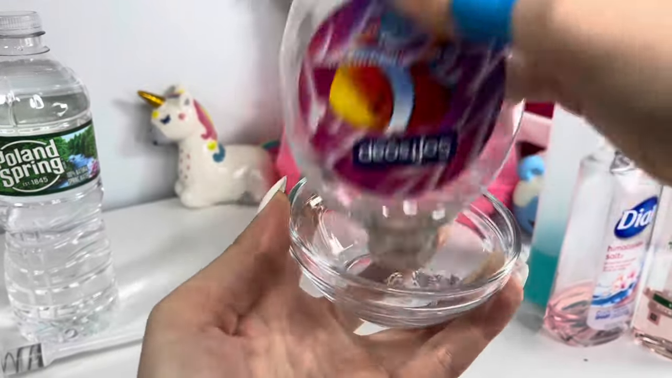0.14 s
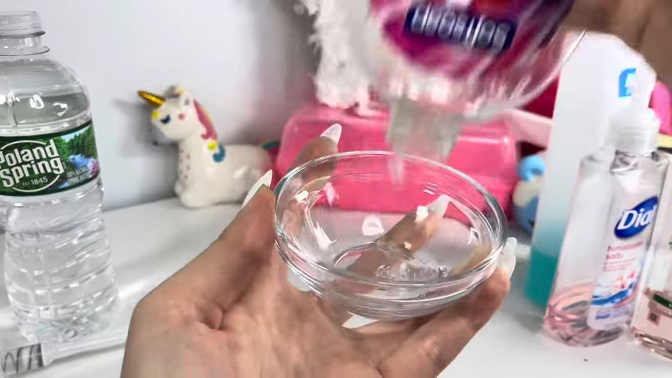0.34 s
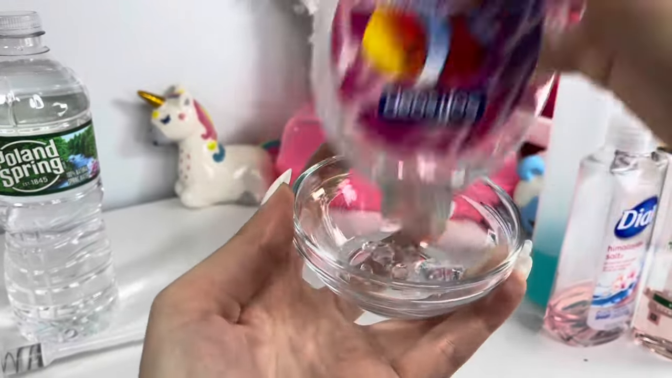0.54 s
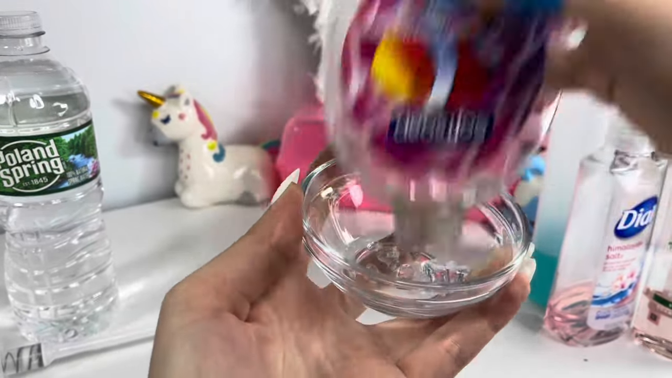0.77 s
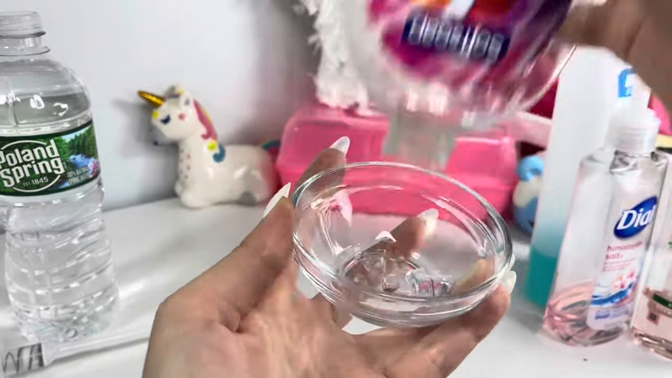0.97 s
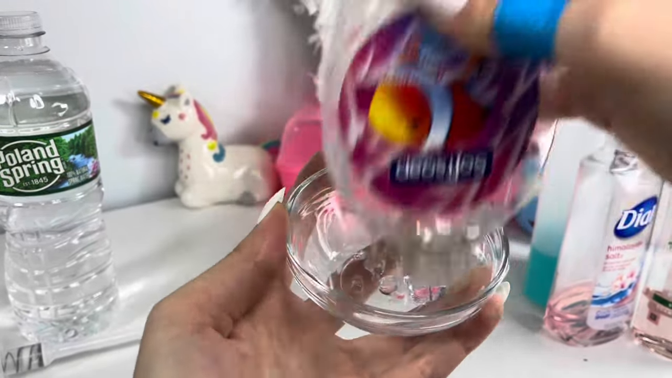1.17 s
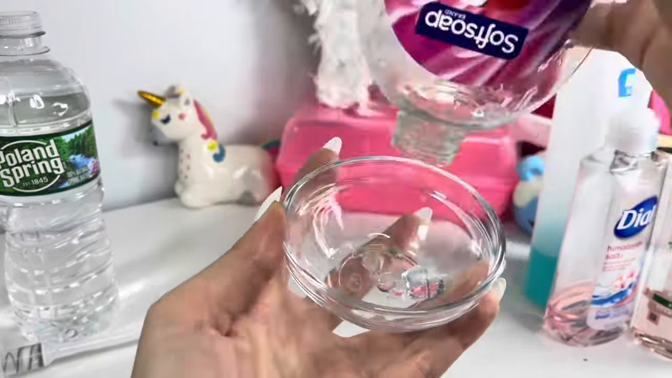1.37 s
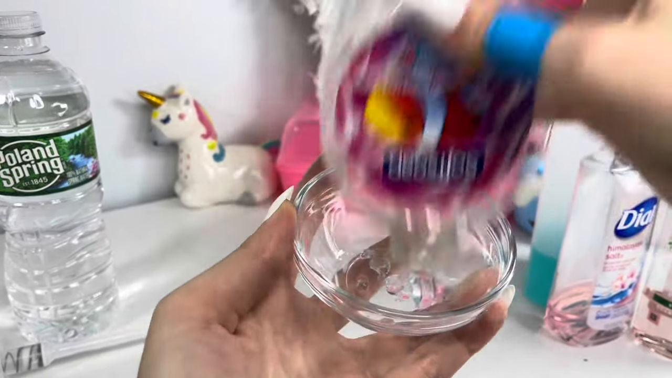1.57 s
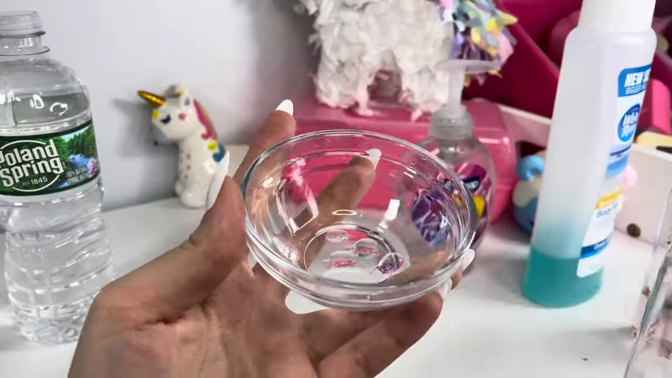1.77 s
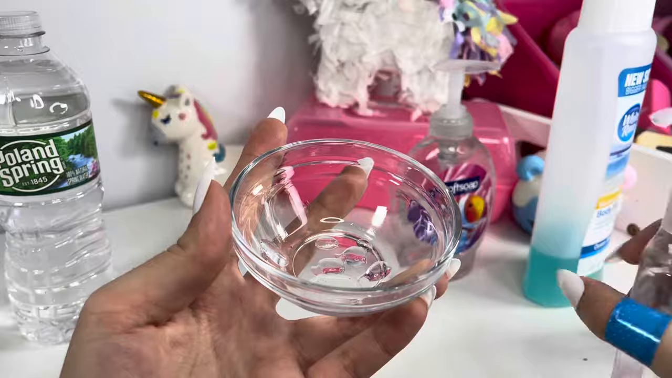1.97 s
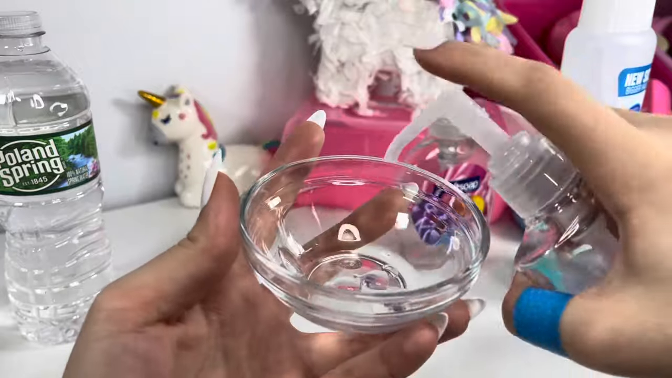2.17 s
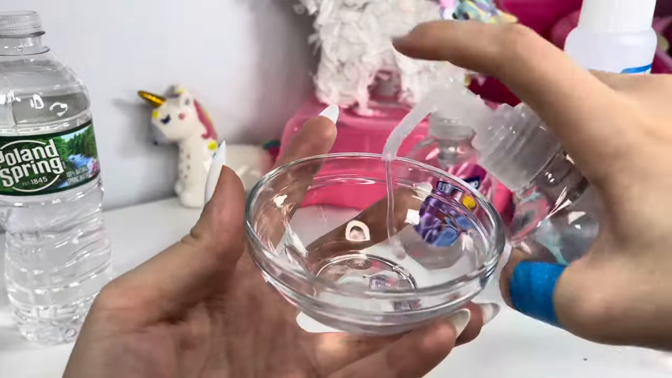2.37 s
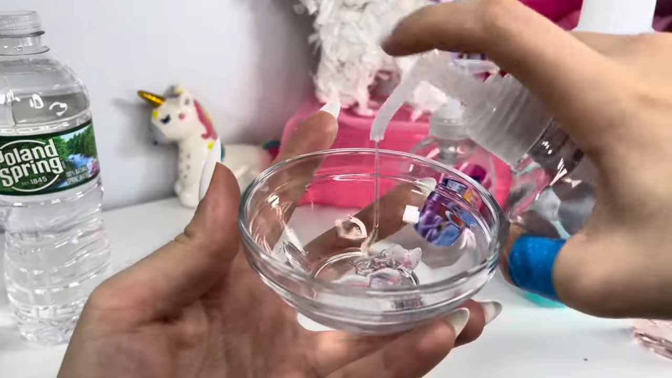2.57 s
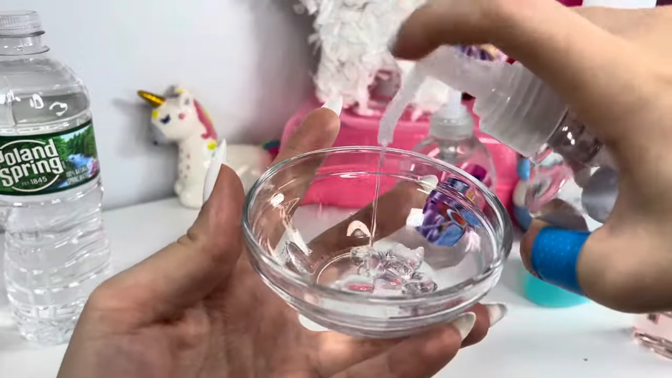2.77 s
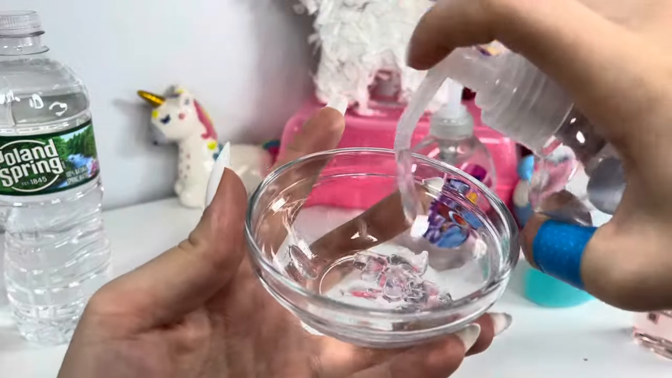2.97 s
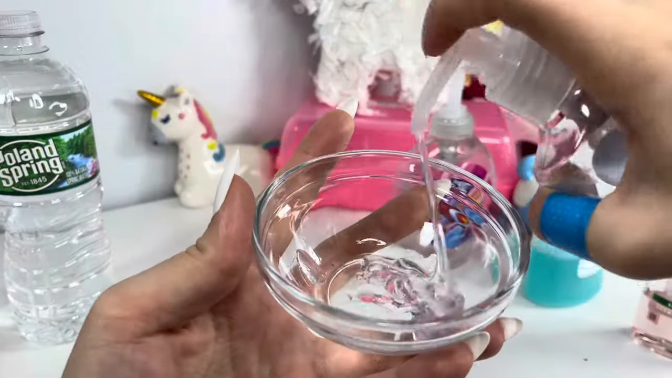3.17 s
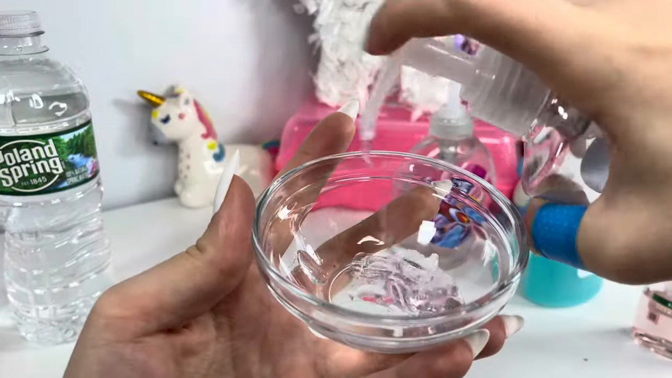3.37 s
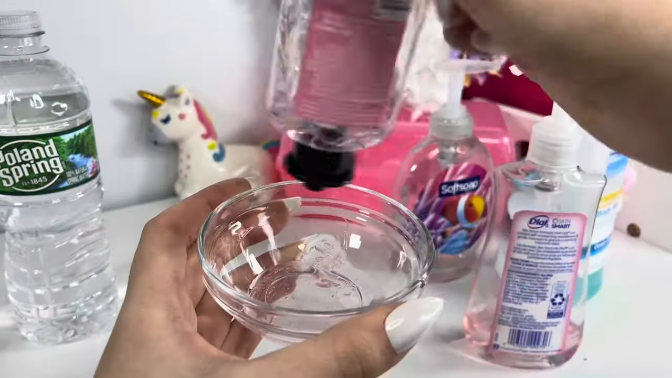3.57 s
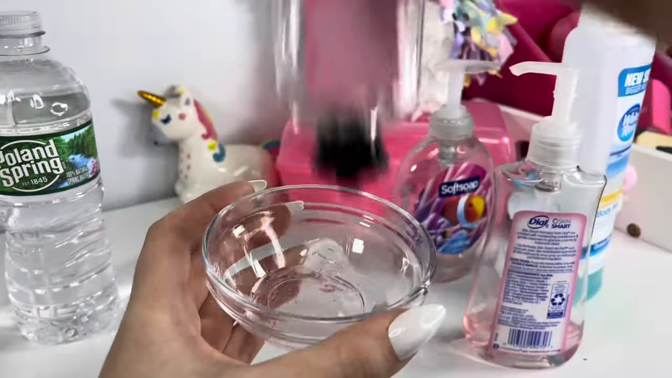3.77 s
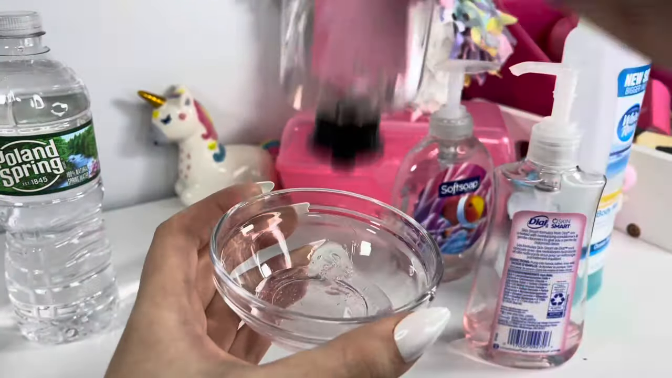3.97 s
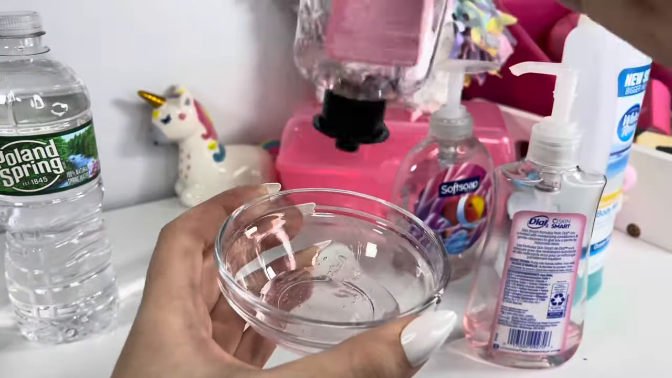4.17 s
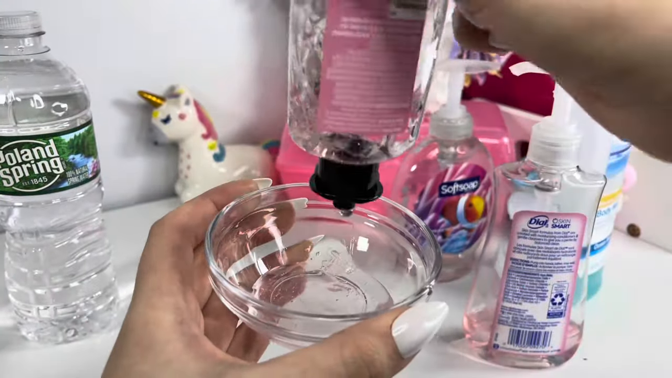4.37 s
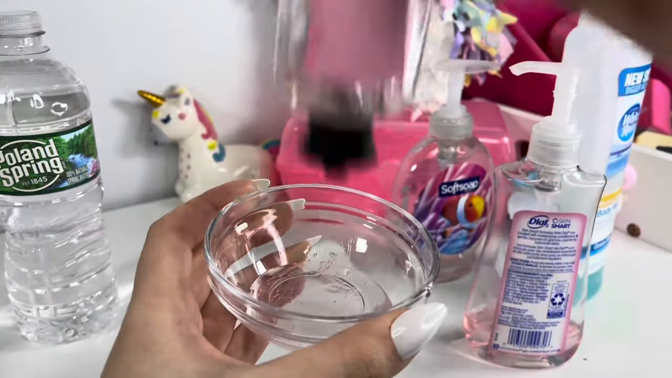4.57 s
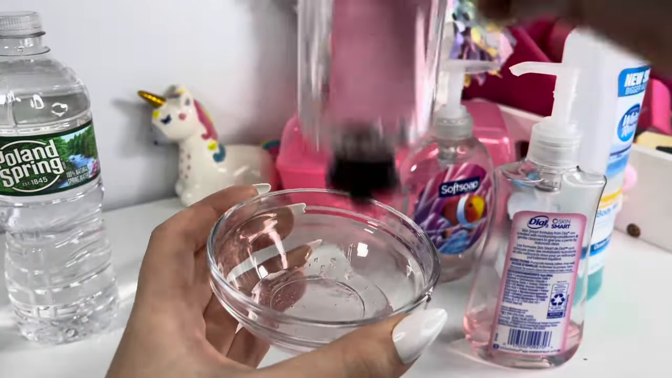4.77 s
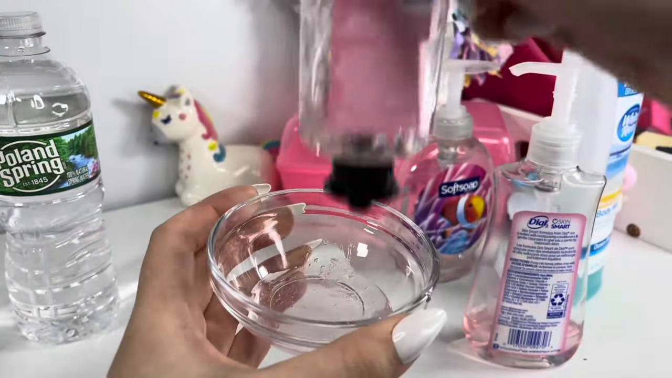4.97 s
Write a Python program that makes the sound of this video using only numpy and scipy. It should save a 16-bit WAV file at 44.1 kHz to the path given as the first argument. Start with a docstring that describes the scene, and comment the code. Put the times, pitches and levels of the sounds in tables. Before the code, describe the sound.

Close, dry stereo phone pickup in a small room with very short reflections and a barely audible low hum. A faint fingertip swish opens; a plastic bottle neck knocks a glass bowl at 0.23 and 0.48 s, bright and quickly damped. From about 0.6 to 1.65 s come tiny plastic creaks and soap ticks, with a clustered triple-contact knock at 1.56. Fingers slide softly near 1.7 and 1.9; a bottle bumps with a slosh at about 1.98. From 2.26 to 3.46 a pump alternates presses and springy returns roughly every 0.08 to 0.12 s: clicks, short hisses, wet spits strongest around 3.1, small bubble pops. Hard desk thumps cluster at 3.55-3.58. A loud, crisp cap snap hits at 3.87, with a weak catch at 4.29. Gel sputters in short bursts at 4.33-4.47 with tiny chirping squeaks and a dull thud. After near silence, the cap snaps sharply at 4.87.

```python
"""Soap bottles and a glass bowl

Plastic soap bottles are emptied into a hand-held glass bowl, close to a phone in a small dry room.
An upturned bottle knocks on the bowl and ticks as it is shaken; a pump clicks, hisses and spits in quick
strokes; a flip cap snaps open, gel and air sputter out, and the cap snaps shut, all over a faint hum.
Contacts are damped modes plus a noise crack; air and rubbing are shaped noise; soap and squeaks are
gliding oscillations."""
import sys
import numpy as np
from scipy import signal
from scipy.fft import rfft, irfft, next_fast_len
from scipy.io import wavfile
from scipy.ndimage import uniform_filter1d

SR = 44100
rng = np.random.default_rng(int(sys.argv[2]) if len(sys.argv) > 2 else 0)


def store_pcm(level_fs):
    """Save levels as 16-bit WAV."""
    pcm = np.round(np.clip(level_fs, -1, 1) * 32767).astype(np.int16)
    wavfile.write(sys.argv[1], SR, np.atleast_2d(pcm).T)


N = 221602
TIME = np.arange(N) / SR

# Levels are relative, before panning and gains in the code. Modes are nominal: blows shift pitch and decay.
# still air, spectrum: freq_hz, level_db
AIR_SPECTRUM = [(15, -48.5), (25, -26), (117, 1.5), (170, -4.5), (293, -12.5), (354, -15), (591, -13),
                (818, -22), (2220, -29.5), (2690, -26.5), (5730, -45.5), (9320, -41.5), (13200, -21),
                (16000, -37.5)]
HUM_HZ, HUM_DB, AIR_DB = 116.59, -74, -72.5

# room reflections, spectrum: freq_hz, level_db
ROOM_SPECTRUM = [(100, -6), (330, 1.5), (560, 8), (850, 4.5), (1500, -3), (4000, -3.5), (9000, -2.5),
                 (16000, -7)]
ROOM_T60_S, ROOM_DB = 0.14, -17.5

# left/right level difference for sounds at the bowl: freq_hz, left_minus_right_db
PORT_SHADE = [(300, -1), (700, -2), (1700, 5), (2600, 4), (4200, -2.5), (7000, -2), (12000, 0)]
LEFT_LEAD_S = .00006

# fingers sliding over plastic: start_s, length_s, level_db
SLIDES = [(1.69, 0.20114, -66), (1.9, 0.13496, -60.5), (2.23, 0.27342, -70.5), (3.3, 0.19142, -63),
          (3.62, 0.12, -74.5), (4.17, 0.4111, -69), (4.9, 0.0938, -72)]
# sliding fingers, spectrum: freq_hz, level_db
SLIDE_SPECTRUM = [(120, -54), (200, -4.5), (456, -11.5), (735, -14.5), (1400, -20.5), (1560, -33),
                  (1770, -17.5), (3250, -16.5), (12600, -23), (16000, -33)]
# short swishes of a fingertip on the bottle: start_s, length_s, level_db
SWISHES = [(0, 0.073, -64), (0.102, 0.05, -69.5)]
# fingertip swish, spectrum: freq_hz, level_db
SWISH_SPECTRUM = [(400, -9.5), (1800, -9), (2900, -2.5), (3700, -10.5), (8000, -34), (16000, -29.5)]
SLIDE_ATTACK_S, SLIDE_RELEASE_S = 0.004, 0.023
HOLD_DB = -81.5  # faint rustle of the hand that holds the bowl

# contact crack, spectrum: freq_hz, level_db
CRACK_SPECTRUM = [(50, -52), (200, -16), (600, -13), (2000, 4), (6000, -1), (11000, 0.5), (16000, -5)]
MODE_SCATTER = .025  # largest random detuning, fraction of mode frequency

# loudest creaks of plastic walls: start_s, level_db, tilt_db_per_octave
CREAKS = [(.73, -51.5, 3), (1.0227, -49, -1), (1.165, -54.5, -1), (1.25, -54, -5.5), (1.402, -56, -9),
          (1.4183, -53, 5), (1.45, -45, 16), (2.2895, -52, 9.5), (3.5276, -49, -2), (4.0712, -55, 12.5),
          (4.139, -54, -1.5)]
# shaken bottle, modes: freq_hz, level_db, t60_s
BOTTLE_MODES = [(599.9, -8.5, 0.064), (1592, -7.5, 0.017), (1784.3, -1, 0.017), (3830, -7, 0.022)]
SHAKE_START_S, SHAKE_LENGTH_S = .72, 0.95  # span of the faint random creaks
CREAK_DB, CREAK_RANGE_DB, CREAK_TILT_DB = -64, 6, 0

# bottles bumped and set down on the desk: start_s, level_db, tilt_db_per_octave, ring_factor
THUMPS = [(1.968, -32, 1.5, 0.511), (2.002, -44.5, 5.5, 0.7844), (3.5505, -33.5, 5, 0.6444),
          (3.553, -29, 5.5, 0.44), (3.562, -38.5, 3.5, 1), (3.5705, -24, 0.5, 0.61),
          (3.575, -23.5, 0.5, 0.5327)]
# bottle wall flexing in the hand, dull thuds: start_s, level_db, ring_factor
GRIPS = [(2.27, -62.5, 0.709), (2.32, -59.5, 1.005), (2.40, -62.5, 3.313), (4.4605, -35, 0.41)]
# desk, modes: freq_hz, level_db, t60_s
DESK_MODES = [(181.13, -1, 0.09221), (313.94, -0.5, 0.055), (531.98, -0.5, 0.026), (579.63, -23, 0.26),
              (803.1, -5, 0.023), (1342.5, -21, 0.034), (1856.1, -6, 0.014), (3363.1, -6, 0.0076)]
THUD_TILT_DB, THUD_PITCH = -10, .66
RECOIL_DB, RECOIL_RING = -41, 1.4  # thud of the bottle, level relative to the SNAPS entry

# air squeaking through the wet cap: start_s, length_s, start_hz, end_hz, level_db
SQUEAKS = [(4.411, 0.0053, 2784, 3660, -23), (4.415, .010, 3898, 8519, -28),
           (4.4229, 0.0071, 8790, 10220, -25.5), (4.449, .010, 3685, 2381, -22),
           (4.456, 0.004, 10970, 9074, -20)]

# soap sloshing in a bumped bottle: start_s, length_s, level_db
SLOSHES = [(1.914, 0.0153, -54.5), (1.978, 0.014, -28.5), (2.005, .02, -40.5)]
# gel and air sputtering from the flip cap: start_s, length_s, flap_db, spray_db_re_flap
SPUTTERS = [(4.327, .041, -26, -5.5), (4.375, .016, -32.5, -5.5), (4.417, .015, -41, 6.5),
            (4.446, .012, -38.5, 8), (4.4544, .016, -27, -11)]
# spray, spectrum: freq_hz, level_db
SPRAY_SPECTRUM = [(60, -31), (250, -2.5), (800, 13.5), (1300, -3.5), (1800, 6.5), (3200, 7), (5000, -7),
                  (8000, -5), (11000, -1), (15500, -7)]
SLOSH_START_HZ, SLOSH_END_HZ = 311.87, 366.7
SPIT_DELAY_S, SPIT_S, SPIT_START_HZ, SPIT_END_HZ = .002, .014, 390.97, 225.89
PRESS_SPIT_DB, RETURN_SPIT_DB = -41, -51  # at 0 dB flow
SPUTTER_START_HZ, SPUTTER_END_HZ = 866.32, 220.11
FLAP_WANDER = 0.03023  # unsteadiness of the gel flapping in the cap, radians per sample

# large soap bubbles bursting at the pump spout: start_s, level_db
POPS = [(2.5469, -44), (2.668, -54), (2.8389, -52), (2.9129, -56), (3.002, -49.5), (3.1577, -45),
        (3.1692, -41.5), (3.233, -46), (3.2485, -45.5), (3.333, -52.5)]
# bubble at the spout, modes: freq_hz, level_db, t60_s
SPOUT_MODES = [(650.4, 5, 0.006487), (1142.1, -8, 0.0216), (1674.2, 4.5, 0.018), (2397, -14.5, 0.0091),
               (3149.2, 15, 0.01015)]
POP_TILT_DB, POP_PITCH, POP_RING = -6.5, 0.8331, 0.9108

# pump head pushed down to its stop: click_s, click_db, hiss_db, hiss_lead_s
PRESSES = [(2.2596, -43.5, -54.5, .012), (2.4564, -40.5, -48.5, 0.018214), (2.628, -34, -48.5, 0.02148),
           (2.8034, -32.5, -47, 0.007993), (2.9663, -34, -46.5, 0.008577), (3.1284, -33.5, -50, .004),
           (3.2795, -40, -46, .008), (3.4563, -43, -49, 0.009471)]
# pump head springing back up: click_s, click_db, hiss_db, hiss_lead_s
RETURNS = [(2.3765, -28.5, -49, 0.011087), (2.5393, -37, -43.5, 0.00387), (2.718, -31, -45, 0.00544),
           (2.8874, -38, -46.5, 0.011103), (3.0516, -32, -52.5, .02), (3.2116, -36, -38.5, .008),
           (3.379, -42, -51, 0.01426)]
# soap flow as the pump primes and runs out: time_s, flow_db
SOAP_FLOW = [(2.55, -21), (2.8, -6.5), (3.1, -0.5), (3.3, -9), (3.46, -20.5)]
# pump, modes: freq_hz, level_db, t60_s
PUMP_MODES = [(395.02, -9, 0.0061), (821.53, -2.5, 0.008497), (1502.7, -8.5, 0.026), (1801.6, 1.5, 0.012),
              (2648.9, 1, 0.02), (3465.3, 3, 0.011), (4151.9, 9.5, 0.004), (6256, -5, 0.0057),
              (8638, -16, 0.0033), (11942, -15, 0.0057)]
# air and soap past the piston, spectrum: freq_hz, level_db
HISS_SPECTRUM = [(200, 4), (500, 9.5), (800, 3.5), (1600, 11), (3500, 4), (6000, 2), (8000, 4.5),
                 (11300, 4), (16000, 2)]
DRY_STROKE_S, WET_STROKE_S = .036, 0.011  # nominal hiss length, and extra at 0 dB flow
FIRM_CLICK_DB = -31.5  # weaker return clicks than this sound thinner

# flip cap catching and snapping: start_s, level_db, tilt_db_per_octave, pitch_factor, ring_factor
SNAPS = [(3.869, -15.5, 2.5, 0.9936, 0.6415), (4.2878, -40, -0.5, 0.9659, 0.1342),
         (4.8373, -49, -17, 0.788, 0.64), (4.8666, -15.5, -1, 0.9838, 0.5403)]
# flip cap, modes: freq_hz, level_db, t60_s
CAP_MODES = [(653.34, -11, 0.011), (2053.5, -11.5, 0.012), (2586.4, 4.5, 0.016), (3722, 1, 0.023),
             (4259.5, -3, .014), (4824, -10.5, .012), (6247.8, -1.5, 0.027), (7222, -2.5, 0.0069),
             (8627, -3.5, 0.013), (9857.6, -3, 0.024), (11600, -15, 0.021), (12220, -12.5, 0.0084),
             (15460, -11, 0.0092)]
# chattering lid, spectrum: freq_hz, level_db
CHATTER_SPECTRUM = [(100, -39), (700, -17), (1400, -30.5), (2400, 0.5), (3300, -5), (6500, -4),
                    (10000, -7.5), (16000, -10.5)]

# bottle neck on the bowl: start_s, level_db, tilt_db_per_octave, pitch_factor, ring_factor
KNOCKS = [(.2258, -12, -2.0543, 0.99965, 0.6628), (.4758, -14.5, -3.5, 1.037, 0.5419),
          (1.5548, -20, -2, 0.88193, 1.711), (1.5584, -13.5, -4.5, 1.0, 1),
          (1.5632, -21, -4, 0.97265, 0.689)]
# glass bowl, modes: freq_hz, level_db, t60_s
BOWL_MODES = [(342, -20, 0.029), (438.79, -15, 0.045), (591.75, -7.5, 0.023), (795.5, -17, 0.018),
              (1037.6, -8, 0.017), (1307, -14.5, 0.0057), (1562.7, 2, 0.02), (1827.7, -2, 0.028),
              (2146.6, -1, 0.0043), (2603.2, 0, 0.02), (3748.2, 0.5, 0.022), (4536, -6, 0.02),
              (5589, -13.5, 0.0038), (6406.6, -19.5, 0.0089), (7830, -24, 0.0034), (10036, -3, .009)]


def undb(db):
    """Decibels to gain."""
    return 10 ** (np.asarray(db) / 20)


def unit(x):
    """Scale to rms 1."""
    return x / np.sqrt(np.mean(x ** 2))


def decay(t, t60_s):
    """Exponential decay, 60 dB down at t60_s."""
    return np.exp(-np.log(1000) * t / t60_s)


def highpass(x, order, cutoff_hz):
    """Butterworth high-pass."""
    return signal.sosfilt(signal.butter(order, cutoff_hz, "high", fs=SR, output="sos"), x)


def add(out, start_s, x):
    """Mix a stereo sound in at start_s."""
    start = max(int(start_s * SR), 0)
    out[:, start:start + x.shape[1]] += x[:, :N - start]


def pan(x, left_db):
    """Raise left over right by left_db."""
    return x * undb(np.array([[left_db], [-left_db]]) / 2)


def curve_db(f, table):
    """Interpolate a table of level over log frequency."""
    hz, db = np.transpose(table)
    return np.interp(np.log(f), np.log(hz), db)


def noise(count, spectrum, apart_hz=2600):
    """Coloured stereo noise: alike at both ports in the bass, unrelated in the treble."""
    f = np.fft.rfftfreq(count, 1 / SR) + 1
    mid, side = rfft(rng.standard_normal((2, count))) * undb(curve_db(f, spectrum))
    side = side * f / np.hypot(f, apart_hz)
    return unit(irfft(np.array([mid + side, mid - side]), count))


def strike(modes, tilt_db, pitch, ring, crack_db, crack_t60, rise_s, apart_hz):
    """A contact: damped modes and a short crack, rms 1 over the first 4 ms."""
    t = TIME[:SR // 8]
    hz, db, t60_s = np.transpose(modes)[:, :, None]
    # grip and contact point detune the modes from blow to blow
    hz = hz * pitch * (1 + MODE_SCATTER * rng.uniform(-1, 1, hz.shape))
    # higher modes reach the two ports further out of step
    port_phase = rng.standard_normal((2, *hz.shape)) * hz / apart_hz
    phase = rng.uniform(0, 2 * np.pi, hz.shape) + port_phase
    size = undb(db + tilt_db * np.log2(hz / 1000))
    body = np.sum(size * np.sin(2 * np.pi * hz * t + phase) * decay(t, t60_s * ring), axis=1)
    tilt_floor_hz = CRACK_SPECTRUM[1][0]
    crack_spectrum = [(f, d + tilt_db * np.log2(max(f, tilt_floor_hz))) for f, d in CRACK_SPECTRUM]
    crack = noise(len(t), crack_spectrum) * decay(t, crack_t60)
    x = (unit(body) + undb(crack_db) * unit(crack)) * (1 - np.exp(-t / rise_s))
    # a small object radiates little below its lowest mode
    x = highpass(x, 2, 1.1 * hz.min())
    return x / np.sqrt(np.mean(x[:, :SR // 250] ** 2))


def blows(table, modes, crack_db, crack_t60, rise_s, apart_hz, bounce=0.16):
    """Each blow rings the same object, which touches again a millisecond or two later."""
    out = np.zeros((2, N))
    for start_s, db, tilt_db, pitch, ring in table:
        hit = strike(modes, tilt_db, pitch, ring, crack_db, crack_t60, rise_s, apart_hz)
        hit = undb(db) / np.hypot(1, bounce) * hit
        add(out, start_s, hit)
        # the second touch is weaker and carries little bass
        add(out, start_s + rng.uniform(.0009, 0.0021), bounce * highpass(hit, 1, 1200))
    return out


def glide(length_s, start_hz, end_hz):
    """Phase of a gliding oscillation and the arch of its loudness."""
    u = np.linspace(0, 1, max(int(length_s * SR), 32))
    hz = start_hz * (end_hz / start_hz) ** u
    return 2 * np.pi * np.cumsum(hz) / SR, np.sin(np.pi * u)


def background():
    """A wavering appliance hum in still air: a drifting sine over coloured noise."""
    knots = np.linspace(0, TIME[-1], num=50)
    swell_db, drift = (np.interp(TIME, knots, row) for row in rng.standard_normal((2, len(knots))))
    hum = unit(np.sin(2 * np.pi * HUM_HZ * TIME + 0.61 * drift) * undb(swell_db))
    air = noise(N, AIR_SPECTRUM, apart_hz=600.4)
    return pan(undb(HUM_DB) * hum + undb(AIR_DB) * air, left_db=4.0)


def room(x):
    """Dense reflections from desk, shelves and walls die away quickly: a decaying noise response."""
    t = TIME[:SR // 3]
    onset = 1 - np.exp(-(t / 0.00033) ** 2)
    tail = noise(len(t), ROOM_SPECTRUM, apart_hz=900) * decay(t, ROOM_T60_S) * onset
    tail = unit(tail) / np.sqrt(len(t))
    return undb(ROOM_DB) * signal.fftconvolve(pan(x, left_db=-2.5), tail, axes=1)[:, :N]


def at_bowl(x):
    """Sounds at the bowl reach the left port first; level differs between ports by frequency."""
    count = next_fast_len(N)
    f = np.fft.rfftfreq(count, 1 / SR) + 1
    # half the level and time difference goes to each port
    half = undb(curve_db(f, PORT_SHADE) / 2) * np.exp(1j * np.pi * f * LEFT_LEAD_S)
    return irfft(rfft(x, count) * np.array([half, 1 / half]), count)[:, :N]


def rubbing():
    """Skin slides unevenly over a bottle: each slide starts quickly, holds and fades."""
    grip_db = 0.62 * unit(uniform_filter1d(rng.standard_normal(N), size=700))
    speed = undb(HOLD_DB)
    for start_s, length_s, db in SLIDES:
        attack = np.clip((TIME - start_s) / SLIDE_ATTACK_S, 0, 1)
        release = np.exp(-np.maximum(TIME - start_s - length_s, 0) / SLIDE_RELEASE_S)
        speed = np.maximum(speed, undb(db) * attack * release)
    out = noise(N, SLIDE_SPECTRUM) * speed * undb(grip_db)
    for start_s, length_s, db in SWISHES:
        count = int(length_s * SR)
        arch = np.sin(np.linspace(0, np.pi, count))
        add(out, start_s, undb(db) * arch * noise(count, SWISH_SPECTRUM))
    return pan(out, left_db=6.5)


def ticks():
    """Plastic walls creak, and soap taps faintly inside the bottle while it is shaken."""
    creaks = [(*row, 1, 1) for row in CREAKS]
    chance = rng.random((12, 2))
    # one faint creak at random in each equal slot of the shake
    for k, (when, size) in enumerate(chance):
        start_s = SHAKE_START_S + SHAKE_LENGTH_S * (k + when) / len(chance)
        creaks.append((start_s, CREAK_DB + CREAK_RANGE_DB * size, CREAK_TILT_DB, 1, 1))
    walls = blows(creaks, PUMP_MODES, crack_db=7.0, crack_t60=0.004, rise_s=0.00022, apart_hz=2439.9)
    taps = [(.58 + .96 * when, -74 + 9 * size, 0, .92 + .2 * place, .85)
            for when, size, place in rng.random((44, 3))]
    soap = blows(taps, BOTTLE_MODES, crack_db=-5.5, crack_t60=0.018, rise_s=0.0011, apart_hz=2545.3)
    return pan(walls + soap, left_db=5)


def thumps():
    """Bottles hit the desk, and thud dully in the hand when gripped or when the cap snaps."""
    hard = [(s, db, tilt_db, 1, ring) for s, db, tilt_db, ring in THUMPS]
    recoils = [(s, db + RECOIL_DB, RECOIL_RING) for s, db, *_ in SNAPS]
    soft = [(s, db, THUD_TILT_DB, THUD_PITCH, ring) for s, db, ring in list(GRIPS) + recoils]
    out = blows(hard + soft, DESK_MODES, crack_db=-18.5, crack_t60=0.029, rise_s=0.0012, apart_hz=2480)
    return pan(out, left_db=7.0)


def squeaks():
    """A closing air gap whistles, its pitch unsteady in the wet opening."""
    out = np.zeros((2, N))
    port_phase = np.array([[0], [-.9]])
    for start_s, length_s, start_hz, end_hz, db in SQUEAKS:
        phase, arch = glide(length_s, start_hz, end_hz)
        wander = 0.22167 * np.cumsum(rng.standard_normal(len(phase)))
        add(out, start_s, undb(db) * arch * unit(np.sin(phase + wander + port_phase)))
    return pan(out, left_db=10.0)


def flow_db(time_s):
    """Soap flow through the pump, interpolated in dB."""
    return np.interp(time_s, *np.transpose(SOAP_FLOW))


def glug(length_s, start_hz, end_hz, spray_db, wander):
    """A slug of soap flaps as air pushes past it; each flap lets out a puff of spray."""
    phase, arch = glide(length_s, start_hz, end_hz)
    phase = phase + wander * np.cumsum(rng.standard_normal(len(phase)))
    flap = unit(np.sin(phase) + 0.2029 * np.sin(2 * phase))
    puffs = unit(np.exp(.9 * np.sin(phase)))
    spray = puffs * noise(len(phase), SPRAY_SPECTRUM)
    return arch * (pan(flap, left_db=5.5) + undb(spray_db) * pan(spray, left_db=5.0))


def glugs():
    """Soap sloshes in a bottle, spits from the pump as strongly as it flows, and sputters from the cap."""
    out = np.zeros((2, N))
    for start_s, length_s, db in SLOSHES:
        slosh = glug(length_s, SLOSH_START_HZ, SLOSH_END_HZ, spray_db=-15, wander=0.0095)
        add(out, start_s, undb(db) * slosh)
    for table, spit_db in (PRESSES, PRESS_SPIT_DB), (RETURNS, RETURN_SPIT_DB):
        for click_s, *_ in table:
            spit = glug(SPIT_S, SPIT_START_HZ, SPIT_END_HZ, spray_db=-25, wander=0.02103)
            add(out, click_s + SPIT_DELAY_S, undb(spit_db + flow_db(click_s)) * spit)
    for start_s, length_s, db, spray_db in SPUTTERS:
        sputter = glug(length_s, SPUTTER_START_HZ, SPUTTER_END_HZ, spray_db, FLAP_WANDER)
        add(out, start_s, undb(db) * sputter)
    return out


def hiss_trail(click_s, lead_s):
    """Stroke time left after the click; a stroke lasts longer when more soap flows."""
    stroke_s = DRY_STROKE_S + WET_STROKE_S * undb(flow_db(click_s))
    return max(stroke_s - lead_s, lead_s / 2)


def bubbles():
    """Large bubbles burst at the spout; tiny ones of varied size crackle in the wake of each stroke."""
    pops = [(s, db, POP_TILT_DB, POP_PITCH, POP_RING) for s, db in POPS]
    for click_s, _, hiss_db, lead_s in list(PRESSES) + list(RETURNS):
        trail_s = 0.99 * hiss_trail(click_s, lead_s)
        for when, size, small in rng.random((6, 3)):
            db = hiss_db - 14.0 + 7 * size - 6 * when
            pops.append((click_s + trail_s * when, db, 0, 0.74 + 1.22 * small, .6))
    out = blows(pops, SPOUT_MODES, crack_db=-7, crack_t60=0.009375, rise_s=0.0003355, apart_hz=1895.9)
    return pan(out, left_db=2.5)


def strokes(table, tilt_db, thinning, trail_share):
    """Air and soap hiss past the piston, which clicks; a weak click on the way up is thin and bright."""
    out = np.zeros((2, N))
    for click_s, click_db, hiss_db, lead_s in table:
        bright_db = tilt_db + thinning * max(FIRM_CLICK_DB - click_db, 0)
        click = strike(PUMP_MODES, bright_db, rng.uniform(0.92166, 1.0981), 0.6337, crack_db=-3.0,
                       crack_t60=.009, rise_s=0.00104, apart_hz=1863.2)
        add(out, click_s, undb(click_db) * click)
        trail_s = trail_share * hiss_trail(click_s, lead_s)
        t = np.arange(-2 * lead_s, 2 * trail_s, 1 / SR)
        flow = np.exp(-1.4 * (t / np.where(t < 0, lead_s, trail_s)) ** 2)
        fizz_db = 2.406 * unit(uniform_filter1d(rng.standard_normal(len(t)), size=40))
        # the wet passage is a little different on every stroke
        passage = [(hz, db + 2 * rng.standard_normal()) for hz, db in HISS_SPECTRUM]
        hiss = flow * unit(undb(fizz_db)) * noise(len(t), passage)
        add(out, click_s - 2 * lead_s, undb(hiss_db) * hiss)
    return out


def pump():
    """The head is pressed down with a dull click and springs back with a brighter one."""
    down = strokes(PRESSES, tilt_db=-2, thinning=0.030758, trail_share=1.02)
    up = strokes(RETURNS, tilt_db=3.5, thinning=1.0894, trail_share=0.54)
    out = pan(down, left_db=2.5) + pan(up, left_db=3.0)
    # held to the right: left port hears it 3 samples later
    out[0] = np.roll(out[0], 3)
    return out


def cap():
    """The lid snaps open or shut; the thin plastic chatters for a few milliseconds."""
    snaps = blows(SNAPS, CAP_MODES, crack_db=-8, crack_t60=.008, rise_s=.0006, apart_hz=3000, bounce=.6)
    out = undb(-2.5) * snaps
    rise_s, chatter_t60_s = .0007, .019
    t = TIME[:SR // 20] - 10 * rise_s
    # quick rise, then decay
    envelope = np.exp(np.minimum(t / rise_s, -np.log(1000) * t / chatter_t60_s))
    for start_s, db, *_ in SNAPS:
        chatter = envelope * noise(len(t), CHATTER_SPECTRUM)
        add(out, start_s + t[0] + rise_s, undb(db + 3.5) * chatter)
    return undb(-1.0) * pan(out, left_db=6.0)


def knocks():
    """The bottle neck strikes the glass bowl and rings its modes."""
    out = blows(KNOCKS, BOWL_MODES, crack_db=-6, crack_t60=0.012, rise_s=0.00027, apart_hz=5011, bounce=0.15)
    return pan(out, left_db=5.0)


def scene():
    """All handling sounds, their room and the background."""
    bowl_side = at_bowl(knocks() + thumps() + glugs() + squeaks())
    near = bowl_side + cap() + pump() + bubbles() + ticks() + rubbing()
    return near + room(near) + background()


def record(dry):
    """The phone drops the deepest bass, rounds the loudest peaks and cuts the top."""
    ceiling, top_hz = 1.2, 16300
    thin = highpass(dry, 2, 52)
    rounded = ceiling * np.tanh(thin / ceiling)
    return signal.sosfilt(signal.ellip(8, .2, 70, top_hz, fs=SR, output="sos"), rounded)


dry = scene()
out = record(dry)
store_pcm(out)
```